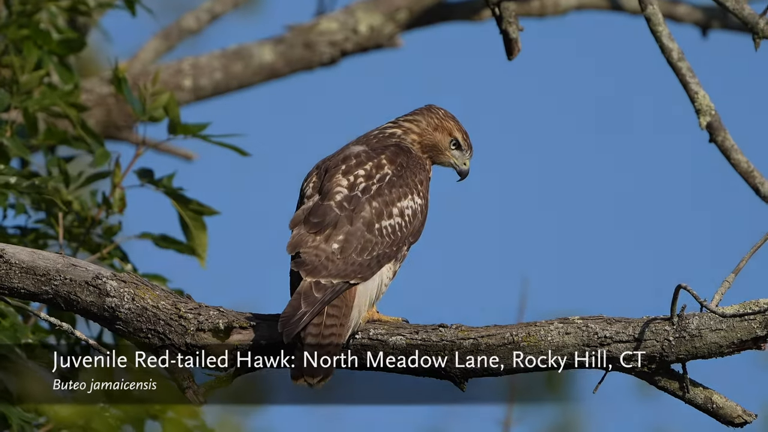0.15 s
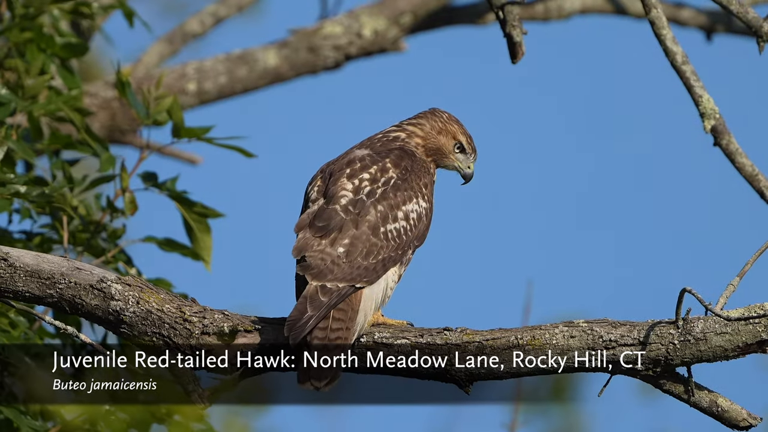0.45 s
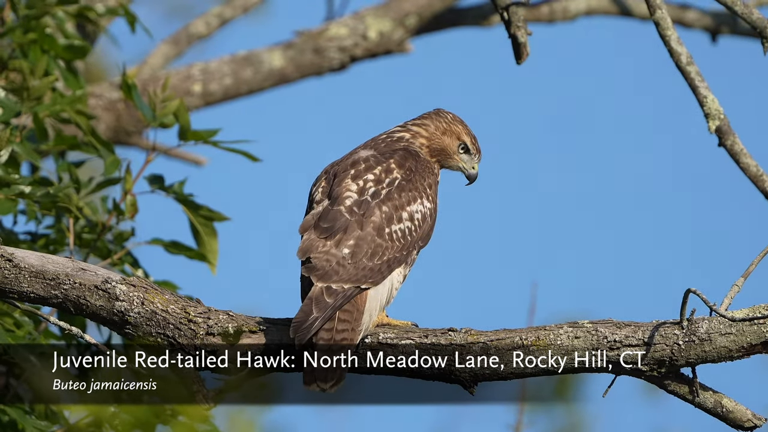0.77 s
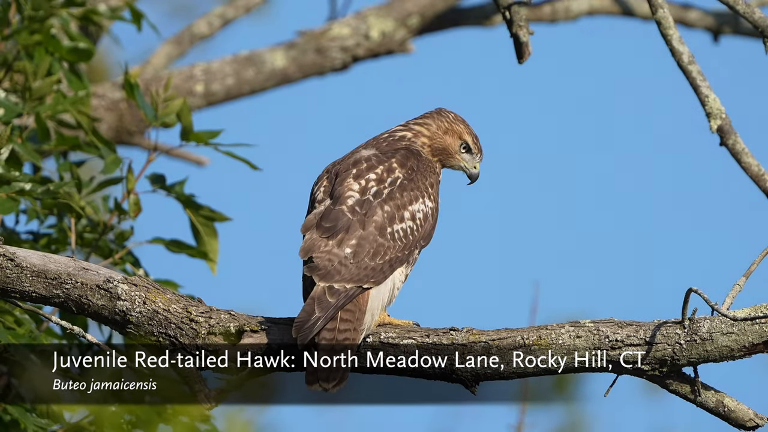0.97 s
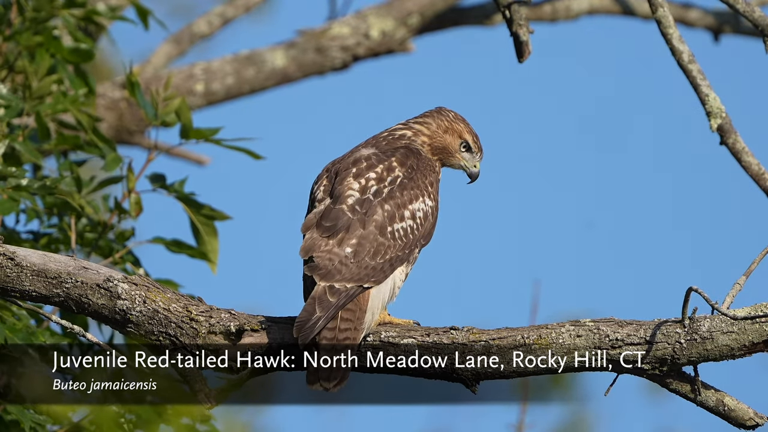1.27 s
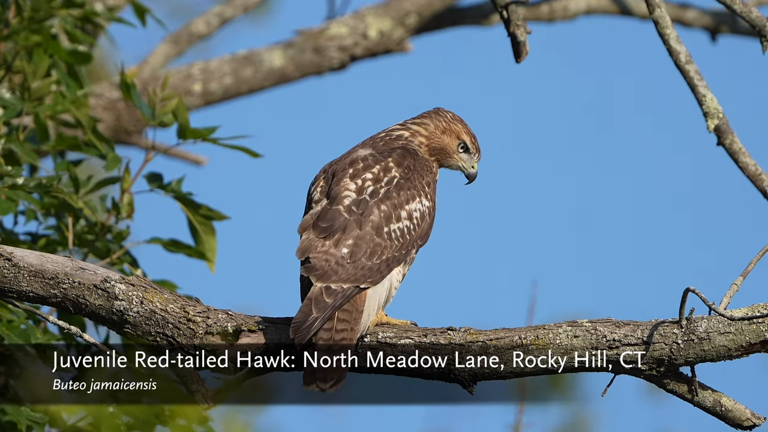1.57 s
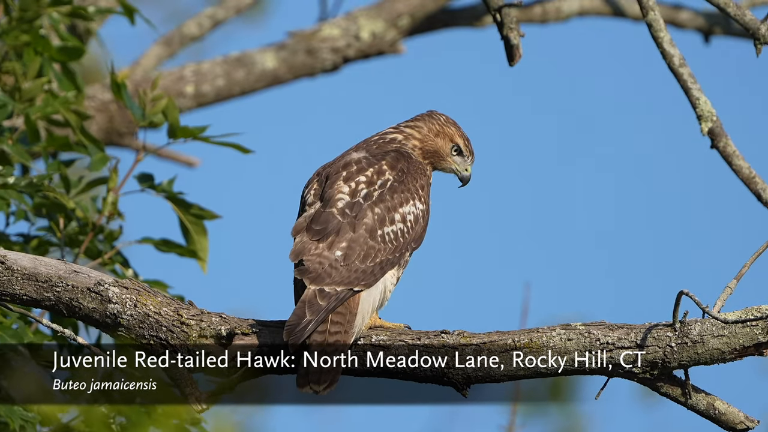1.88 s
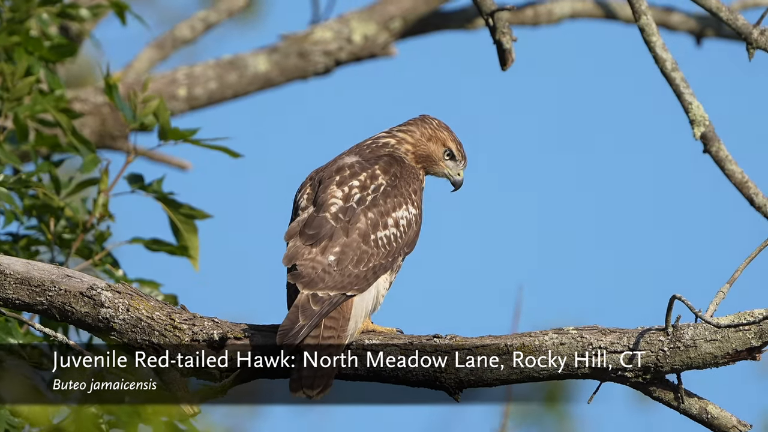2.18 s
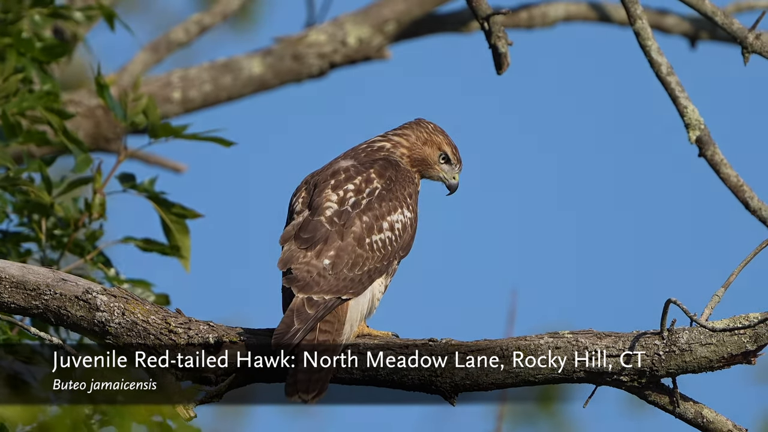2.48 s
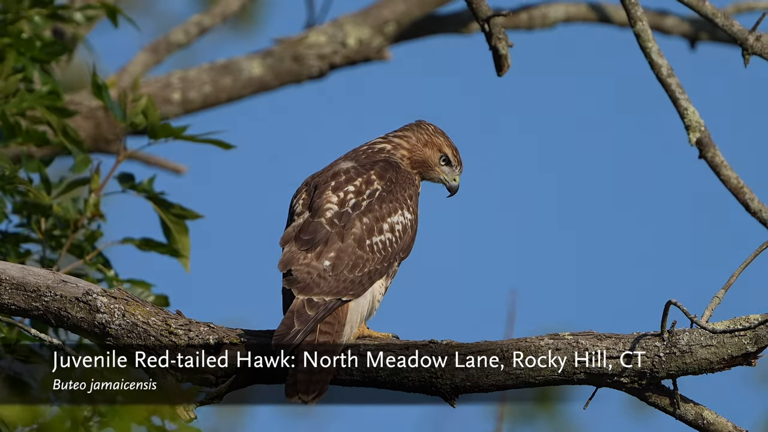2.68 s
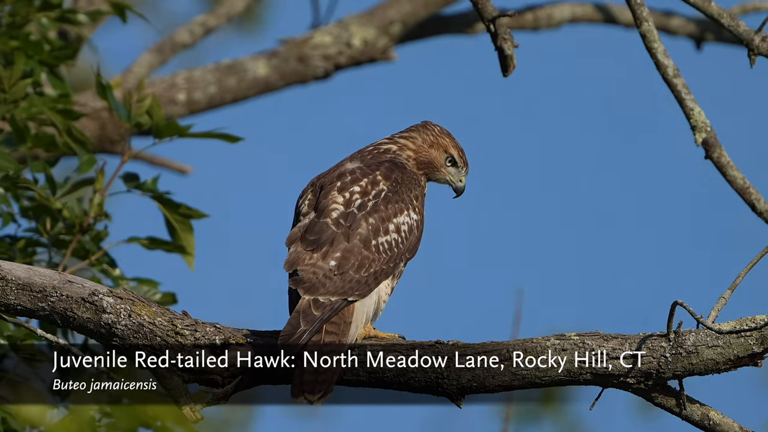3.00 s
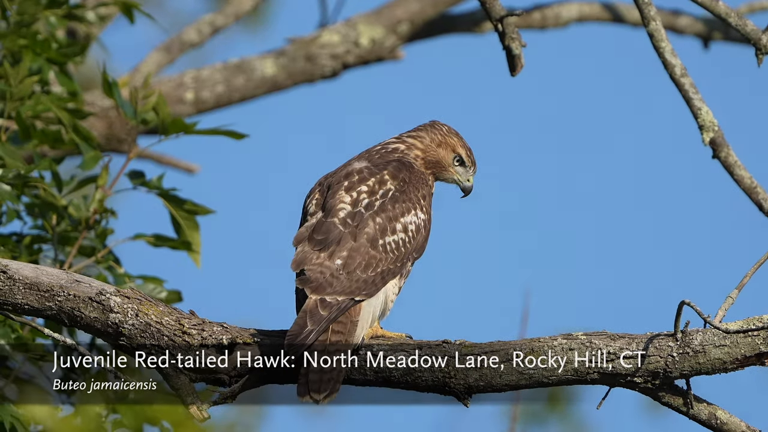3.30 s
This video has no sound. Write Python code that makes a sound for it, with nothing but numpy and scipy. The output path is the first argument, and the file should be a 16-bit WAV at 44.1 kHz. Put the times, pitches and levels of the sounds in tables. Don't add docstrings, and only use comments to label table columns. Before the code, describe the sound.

Insects hold a steady high-pitched buzz outdoors over low wind rumble and faint bird chirps.

```python
import sys
import numpy as np
from scipy import signal
from scipy.fft import rfft, irfft
from scipy.io import wavfile
from scipy.ndimage import uniform_filter1d

SR = 44100
rng = np.random.default_rng(int(sys.argv[2]) if len(sys.argv) > 2 else 0)


def transcribe(signal):
    frames = np.atleast_2d(signal).T
    limited = np.clip(frames, -1, 1)
    pcm = np.round(limited * 32767).astype(np.int16)
    wavfile.write(sys.argv[1], SR, pcm)


def rack_gain(trim_db):
    fader = np.asarray(trim_db, float)
    return 10 ** (fader / 20)


N = 152145
T = np.arange(N) / SR
HZ = np.fft.rfftfreq(N, 1 / SR)
SIDES = np.array([[1], [-1]])


def unit(x):
    return x / np.sqrt(np.mean(x ** 2))


def colour(x, table, edge_db=-60):
    hz, db = np.array(table).T
    gain_db = np.interp(np.log(HZ + 1), np.log(hz), db, edge_db, edge_db)
    return irfft(rfft(x) * rack_gain(gain_db), N)


def pair(alike):
    mid, side = rng.standard_normal((2, N))
    alike = np.clip(alike, 0, 1)
    return np.sqrt(1 + alike) * mid + np.sqrt(1 - alike) * side * SIDES


def walk(rate_hz):
    hold = int(SR / rate_hz)
    steps = np.repeat(rng.standard_normal(N // hold + 1), hold)
    return unit(uniform_filter1d(uniform_filter1d(steps, hold), hold)[:N])


def place(pan_db):
    return rack_gain(SIDES * pan_db / 2)


# (frequency [Hz], level [dB])
DRONE_LINES = [(52, -41), (103, -42), (152, -53), (188, -54), (264, -60), (301, -64), (1069, -64),
               (1172, -64)]
# (frequency [Hz], level [dB])
ROAR_TONE = [(200, 15), (350, -0.5), (600, -0.5), (900, -0.5), (1300, -8)]


def engine():
    width_hz, stops_s = 5.2, 2.7
    lines = sum(rack_gain(db) / (1 + ((HZ - hz) / width_hz) ** 2) for hz, db in DRONE_LINES)
    drone = irfft(rfft(pair(0.99)) * lines, N) * np.sqrt(SR / np.pi / width_hz)
    roar = unit(colour(pair(0.49), ROAR_TONE)) * rack_gain(-49)
    return (drone + roar) / (1 + np.exp((T - stops_s) / 0.26))


# (frequency [Hz], level [dB])
ROAD_TONE = [(250, -4), (500, -16), (1150, 0), (1450, -7), (1800, -11.5), (2500, -8), (3500, -15),
             (5600, -10.5)]


def road():
    level_db = -47.5 + 0.23 * walk(4.9) + 0.75 * walk(20)
    return unit(colour(pair(0.44), ROAD_TONE)) * rack_gain(level_db) * place(1.9)


# (frequency [Hz], level [dB])
HAZE_TONE = [(5000, 1.5), (6800, -1.5), (7600, 3), (8600, 1), (10500, 2.5), (12500, 3.5), (14500, 5),
             (16000, -10)]


def haze():
    return unit(colour(pair(0), HAZE_TONE)) * rack_gain(-46 + 0.8 * walk(8.16))


# (time [s], level [dB])
GUST_LEVEL = [(0, -67), (.1, -50), (.2, -36), (.36, -24.5), (.46, -26), (.56, -32), (1.0, -34.5),
              (1.3, -36), (1.65, -43.5), (1.9, -36.5), (2.3, -35), (2.85, -39.5), (3.1, -46.5),
              (3.27, -53.5), (3.42, -45)]
# (frequency [Hz], level [dB])
WIND_MID_TONE = [(20, -1), (45, -2), (80, -2), (130, -7.5), (220, -22), (350, -32.5), (600, -55.5)]
# (frequency [Hz], level [dB])
WIND_SIDE_TONE = [(20, -32), (45, -6), (80, -13.5), (130, -12), (220, -23), (350, -32.5), (600, -50)]
# (time [s], peak level [dB], length [s], pan [dB])
EDDIES = [
    (.364, -16, 0.0023, 5.5),
    (.43, -15.5, 0.0026, -3),
    (.712, -20.5, 0.0053, 7),
    (1.359, -24.5, 0.0052, -9),
    (1.794, -21.5, .007, -6),
    (2.031, -21, 0.0059, 5),
    (2.267, -25.5, 0.0018, -7),
    (2.286, -27, 0.0051, 5),
    (2.483, -26.5, 0.0031, 3),
    (2.846, -32, 0.0038, 6),
]


def wind():
    size = rack_gain(np.interp(T, *np.array(GUST_LEVEL).T) + 1.5 * walk(25.04))
    mid, side = rng.standard_normal((2, N))
    rumble = unit(colour(mid, WIND_MID_TONE) + colour(side, WIND_SIDE_TONE) * SIDES)
    thumps = 0
    for s, db, length, pan_db in EDDIES:
        u = (T - s) / length
        thumps = thumps + place(pan_db) * rack_gain(db) * (1 - u ** 2) * np.exp(-u ** 2 / 2)
    return size * rumble + thumps


# (time [s], length [s], start frequency [Hz], end frequency [Hz], level [dB])
BIRD_NOTES = [
    (.592, .045, 2620, 2680, -45),
    (.63, .036, 2670, 2550, -44.5),
    (.732, .034, 2460, 2070, -46.5),
    (.768, .028, 2030, 1850, -54),
    (.75, .1, 2630, 2690, -57),
]


def bird():
    out = 0
    for s, length, start_hz, end_hz, db in BIRD_NOTES:
        u = np.clip((T - s) / length, 0, 1)
        tone = np.sin(2 * np.pi * np.cumsum(start_hz + (end_hz - start_hz) * u) / SR)
        swell = np.sqrt(np.abs(np.sin(np.pi * u)))
        out = out + rack_gain(db) * np.sqrt(2) * swell * tone
    return out * place(4.5)


# (time [s], frequency [Hz], width [s], peak level [dB], pan [dB])
TWIG_SNAPS = [
    (1.0762, 2800, .0003, -25.5, 4),
    (1.0762, 1100, .0006, -39, 4),
    (1.356, 1200, .0006, -37, 0),
    (3.2971, 1100, .0007, -30, 0),
]


def snaps():
    out = 0
    for s, hz, width, db, pan_db in TWIG_SNAPS:
        burst = np.exp(-((T - s) / width) ** 2) * np.cos(2 * np.pi * hz * (T - s))
        out = out - place(pan_db) * rack_gain(db) * burst
    return out


# (time [s], peak level [dB], pan [dB], onset [s])
TICK_EVENTS = [
    (.532, -33, -5, 0.007),
    (.624, -32, -6, 0.011),
    (.704, -31.5, -8, 0.007),
    (.788, -30.5, -7, 0.0046),
    (.9408, -30.5, -5.5, 0.0022),
    (1.1004, -31.5, -7, 0.0023),
    (1.3219, -34, -6, 0.0024),
    (1.487, -31.5, -6, 0.0029),
    (1.715, -39, 4, .004),
    (1.7893, -37.5, 3.5, 0.0077),
]
# (frequency [Hz], level [dB])
TICK_SPECTRUM = [(7500, -10), (9500, -13), (11000, -3.5), (13000, -4.5), (15300, -4.5), (16500, -28)]


def ticks():
    tooth_hz, t60_s = 670, 0.035
    tail_db, tail_t60_s = -13, 0.3
    size = 0
    for s, db, pan_db, onset in TICK_EVENTS:
        u = np.maximum(T - s + 0.0019, 0)
        decay = rack_gain(-60 * np.maximum(u - onset, 0) / t60_s)
        teeth = (0.7 - 0.62 * np.cos(2 * np.pi * tooth_hz * u)) * decay
        tail = rack_gain(tail_db - 60 * u / tail_t60_s)
        rise = np.minimum(u / max(onset, 0.0005), 1)
        size = size + place(pan_db) * rack_gain(db - 2) * rise * (teeth + tail)
    return size * unit(colour(pair(0.13), TICK_SPECTRUM))


# (start [s], end [s], time of one stroke [s], level [dB])
BUZZ_PHRASES = [
    (-.2, .93, .4734, -45),
    (1.78, 3.6, 2.496, -45),
]
# (frequency [Hz], level [dB])
WING_LEFT_TONE = [(8500, -17.5), (11300, -14), (12000, -3.5), (12700, -4.5), (13300, -6), (14400, 0.5),
                  (15100, -8), (16000, -26)]
# (frequency [Hz], level [dB])
WING_RIGHT_TONE = [(8500, -25), (11300, -5.5), (12200, -11), (13100, 3.5), (13900, -14), (14800, -33),
                   (16000, -29)]


def katydid():
    stroke_hz, depth_db = 41.2, 7
    swell_s, stop_s = 0.42, 0.03
    size = 0
    for start, end, stroke, db in BUZZ_PHRASES:
        hold = np.clip((T - start) / swell_s, 0, 1) * np.clip((end - T) / stop_s, 0, 1)
        pulse = np.cos(2 * np.pi * stroke_hz * (T - stroke)) + 0.5
        size = size + hold * rack_gain(db + depth_db / 2 * pulse)
    left, right = pair(0.29) * SIDES
    hiss = unit(np.array([colour(left, WING_LEFT_TONE), colour(right, WING_RIGHT_TONE)]))
    return place(3) * size * rack_gain(0.6 * walk(12)) * hiss


# (pitch [Hz], spread [Hz], low skirt [Hz], stroke [s], level [dB], throb [dB],
# left lag [samples])
CRICKETS = [
    (6513, 122, 133, 0.0075, -37, 2.5, 1),
    (3922, 105, 39, 0.0075, -52, -0.5, 6.5),
    (2683, 9.8, 1.3, 0.022, -64, 24, -6),
]


def chorus(hz, spread_hz, skirt_hz, stroke_s, db, throb_db, lag, count):
    throb_hz, throb_peak_s, throb_fades_s = 3.257, 1.0, 5.4
    sag = 0.004
    when = rng.random(count) * T[-1]
    low = rng.exponential(size=count)
    pitch_dev, lag_dev, level_dev, pan_dev = rng.standard_normal((4, count, 1))
    u = np.arange(int(stroke_s * SR))
    pitch = hz + spread_hz * pitch_dev - skirt_hz * low[:, None]
    phase = 2 * np.pi * pitch * u * (1 - sag * (u / len(u) - 1) / 2) / SR
    late = 2 * np.pi * pitch * (lag + 1.9 * lag_dev) / SR
    throb = throb_db * np.exp(-when / throb_fades_s) * np.cos(2 * np.pi * throb_hz * (when - throb_peak_s))
    stroke_db = throb[:, None] + 0.99 * level_dev - 1.2 * low[:, None]
    size = np.sin(np.pi * u / len(u)) * rack_gain(stroke_db)
    at = ((when * SR).astype(int)[:, None] + u).ravel()
    left = size * rack_gain(2 * pan_dev) * np.sin(phase - late)
    right = size * rack_gain(-2 * pan_dev) * np.sin(phase)
    both = np.array([np.bincount(at, ear.ravel(), N)[:N] for ear in (left, right)])
    return unit(both) * rack_gain(db + 0.27 * walk(9.21))


# (time [s], gain [dB])
FADE_IN = [(0, -63), (.08, -40), (.2, -20.5), (.29, -6), (.38, -1.5)]


def scene():
    fade_db = np.interp(T, *np.array(FADE_IN).T)
    background = engine() + road() + haze()
    events = bird() + snaps() + ticks() + katydid()
    others = chorus(*CRICKETS[1], count=6000) + chorus(*CRICKETS[2], count=400)
    crickets = chorus(*CRICKETS[0], count=11000) * place(0.65)
    return wind() + rack_gain(fade_db) * (background + events + others) + rack_gain(0.75 * fade_db) * crickets


def top_cut(x):
    return signal.sosfilt(signal.butter(12, 16820, fs=SR, output="sos"), x)


def record(dry):
    low_pass = signal.ellip(8, 0.2, 60, 15800, fs=SR, output="sos")
    mix = signal.sosfilt(low_pass, dry)
    return top_cut(mix)


dry = scene()
out = record(dry)
transcribe(out)
```